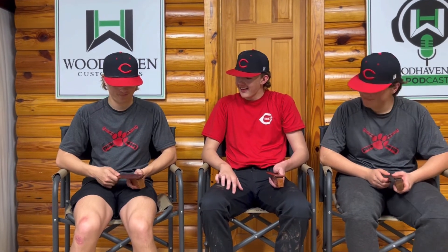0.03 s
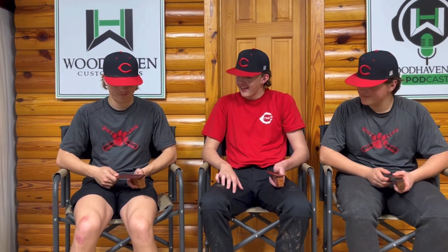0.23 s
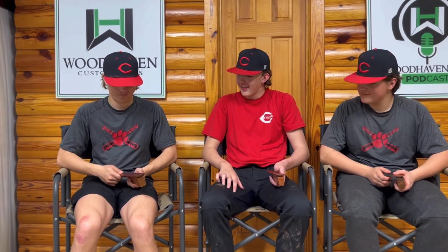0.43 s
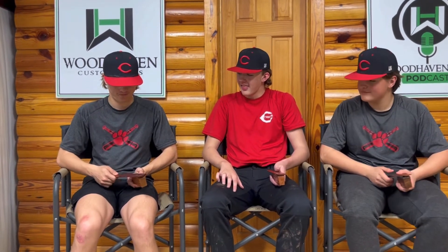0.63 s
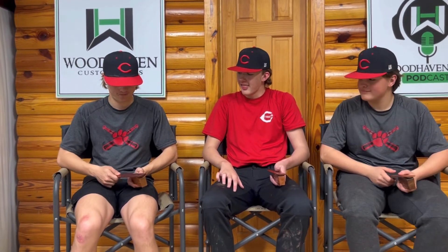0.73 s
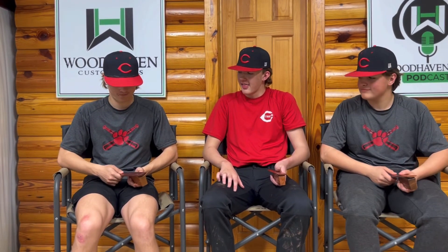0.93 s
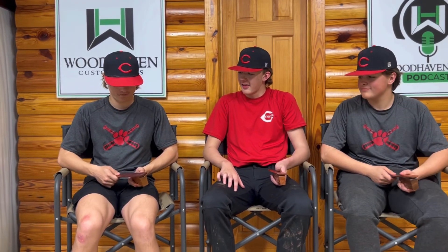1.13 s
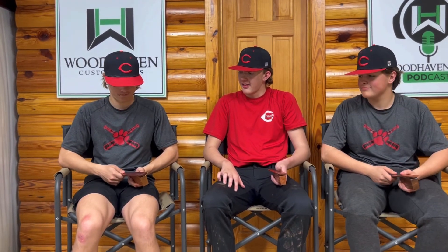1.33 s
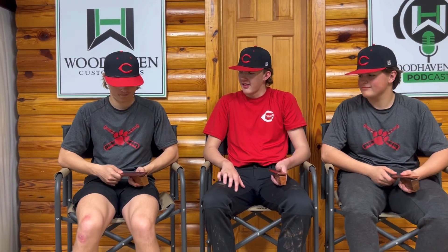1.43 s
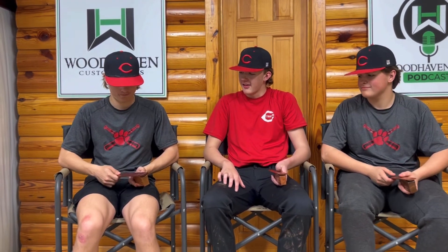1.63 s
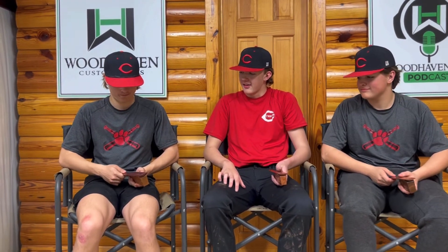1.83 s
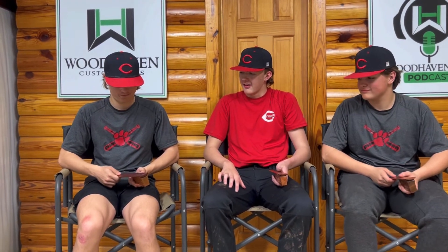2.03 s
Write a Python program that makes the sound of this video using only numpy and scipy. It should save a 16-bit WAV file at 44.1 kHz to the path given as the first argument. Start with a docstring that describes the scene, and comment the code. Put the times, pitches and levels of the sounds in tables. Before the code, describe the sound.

A wooden friction turkey call gives four short, evenly spaced yelps, each starting clean and breaking upward into rasp. An earlier note's echo fades first. Log-walled room, stereo microphone a few metres away, faint rumble below.

```python
"""The echo of an earlier stroke dies away, then a friction turkey call yelps four times in a log-walled room.
In each yelp a wooden tip dragged over a plate sticks and slips about 800 times a second. It catches with a
burst of grit, sounds clean, then skids: the pitch jumps and a rasp swells and fades. The plate colours the slips
and the room rings on. Two microphone ports a few metres off hear it. A hum that dips and returns, and a steady
low rumble, lie underneath throughout."""
import sys
import numpy as np
from scipy import signal
from scipy.fft import rfft, irfft, next_fast_len
from scipy.io import wavfile
from scipy.ndimage import uniform_filter1d

SR = 44100
rng = np.random.default_rng(int(sys.argv[2]) if len(sys.argv) > 2 else 0)


def voltage_ratio(level):
    """Linear amplitude factor for a level in decibels (scalar or array-like)."""
    return 10 ** (np.asarray(level, float) / 20)


def bounce(signal):
    """Save signal as a 16-bit WAV file at the path given by the first command-line argument."""
    frames = np.transpose(np.atleast_2d(signal))
    limited = np.clip(frames, -1, 1)
    pcm = np.round(limited * 32767).astype(np.int16)
    wavfile.write(sys.argv[1], SR, pcm)


N = 92610
LEAD = SR // 2  # samples worked out before time zero

# The path of each stroke, the first only an echo by time zero: [t/s, slip rate f/Hz, level/dB]
STROKE_PATHS = [
    [(-.26, 733, -9), (-.2, 785, -16), (-.14, 859, -29)],
    [(.2, 772.6, -32), (.213, 731.6, -24), (.24, 751, -18.5), (.28, 780.3, -17.5), (.315, 797.7, -16),
     (.338, 800.5, -21.5), (.362, 837.4, -25.5), (.385, 810, -47)],
    [(.636, 702, -49), (.648, 698.3, -35.5), (.66, 724.2, -29.5), (.696, 735.3, -22.5), (.708, 773.6, -25),
     (.76, 789.1, -20.5), (.805, 803.6, -19), (.825, 772.4, -27.5), (.85, 805.3, -24.5), (.878, 769, -51)],
    [(1.177, 804, -26), (1.184, 750.7, -23.5), (1.195, 768, -23.5), (1.235, 783.8, -18),
     (1.262, 805.7, -18.5), (1.288, 818.5, -19.5), (1.316, 829.8, -26), (1.34, 965, -34)],
    [(1.598, 735, -35), (1.63, 706.3, -24.5), (1.652, 726.8, -22), (1.662, 765.2, -26), (1.7, 785, -19),
     (1.75, 798, -20), (1.77, 795.2, -17), (1.82, 822.3, -25), (1.85, 862, -59)],
]
# Where each stroke's tip skids: [t/s, rate jump f/Hz before it is shaped in time,
# rasp 0-1 before it is shaped in time, steady grit level/dB against the slips]
SKIDS = [(-.17, 111, 0.2, -11.5), (0.323, 116.8, 0.8, -19.5), (0.829, 57, 1, -13.5),
         (1.266, 103.6, 0.67, -15.5), (1.751, 102.2, 1, -16.5)]
# How the plate colours the slips: [f/Hz, relative level/dB]
PLATE_COLOUR = [(400, -29.5), (720, -22), (840, -26.5), (1450, -8), (1650, -1), (2150, -8.5), (2550, 7),
                (3050, -12.5), (3550, -20.5), (3930, -17.5), (4680, -14.5), (5050, -21), (5350, -18.5),
                (6000, -22.5), (6500, -25), (9000, -34), (15500, -47)]
# Colour of the gritty hiss: [f/Hz, relative level/dB]
GRIT_COLOUR = [(200, -20.5), (800, -59), (1350, 4.5), (1980, 5), (2700, 14.5), (4000, -9), (6500, -1),
               (9000, -19), (15500, -46)]
# Time the room takes to fade by 60 dB: [f/Hz, t/s]
ROOM_FADE = [(600, 0.16), (1600, 0.27), (2260, 0.33), (4000, 0.47), (11000, 0.61)]
# The part of the echo that differs left and right, against the shared part: [f/Hz, level/dB]
ROOM_DIFFERENCE = [(500, 3.5), (1600, -4.5), (3500, 28.5), (6500, -11.5), (8500, -9), (12000, -85)]
# Bands that hang on in the room: [f/Hz, level/dB against the room]
LINGERING_BANDS = [(1400, -17.5), (2000, -12.5)]
# Loudness of the left port over the right: [f/Hz, level/dB]
PORT_LEVEL_GAP = [(1700, -0.5), (2200, -7.5), (2800, -3), (4000, 9.5), (6000, 9), (7500, 13), (8500, -3)]
# How far the left port leads the right: [f/Hz, phase/radians]
PORT_PHASE_LEAD = [(0, 0), (700, .6), (1750, .7), (2050, 3.5), (2800, 3.3), (4100, 4), (6000, 6),
                   (7000, 8.8), (8270, 6.3), (10100, 3.14), (15300, -6.3)]
# The hum tones before drift, swell and pan: [f/Hz, rms level/dB]
HUM_TONES = [(91.5, -64), (140.0, -62.5)]
# The hum dips and returns: [t/s, level/dB]
HUM_LEVEL_PATH = [(0, 3), (.95, 2), (1.1, -6), (1.5, -5.5), (1.9, 0), (2.1, -3.5)]
# Colour of the rumble: [f/Hz, relative level/dB per Hz]
RUMBLE_COLOUR = [(20, -67), (31, -39), (42, 3.5), (126, -0.5), (157, -16), (189, -11), (300, -24),
                 (500, -30), (1300, -40)]

LAND_S, LIFT_S = 0.0064, 0.018  # the tip lands and lifts
CATCH_DB, CATCH_S = -8.5, 0.004  # burst of grit as the tip catches, and its decay
SKID_S, SETTLE_S, RASP_FADE_S = 0.0018, 0.005, 0.035  # skid builds, pitch settles, rasp fades
JITTER_CLEAN, JITTER_RASP = 0.006, 0.022  # spread of the slip rate before smoothing, share; rasp adds
SIZE_CLEAN_DB, SIZE_RASP_DB = 0.3, 3  # spread of the slip size before smoothing; rasp adds
SCRAPE_RASP_DB = -10  # grit added at full rasp
WOBBLE_DB, WOBBLE_S = 5, 0.016  # spread of the wobble points, and the time between them
BRIGHTEN = 0.18  # dB per octave of tilt for each dB of level
ROOM_DB, ROOM_GAP_S = -4.5, 0.003  # dense echo against the direct sound; wait for it
LINGER_T60_S = 0.53  # time for a lingering band to fade by 60 dB
HUM_DRIFT = 0.0067  # spread of the random phase step, radians per sample
RUMBLE_DB, RUMBLE_SIDE_DB = -59.5, -12  # rms before pan; left-right part against the middle
BACKGROUND_PAN_DB = 2  # left over right, hum and rumble alike


def colour(x, table, turn=False):
    """Weights the spectrum by (Hz, dB) points, or turns its phase by (Hz, radians) points."""
    size = next_fast_len(x.shape[-1])
    hz = np.arange(size // 2 + 1) * SR / size + 1
    f, v = np.array(table, float).T
    if turn:
        gain = np.exp(1j * np.interp(hz, f, v))
    else:
        gain = voltage_ratio(np.interp(np.log(hz), np.log(f + 1), v))
    return irfft(rfft(x, size) * gain, size)[..., :x.shape[-1]]


def set_rms(x, db):
    """Scales the sound so that its average strength (rms) is db."""
    return x * voltage_ratio(db) / np.sqrt(np.mean(x ** 2))


def slip_tone(t, phase, db):
    """Regular slips make a pitch with 18 harmonics; more level brightens them, and the upper ones wobble."""
    wobble = rng.standard_normal((19, 20))
    points = (t - t[0]) / WOBBLE_S
    tone = np.zeros(len(t))
    for k in range(1, 19):
        gain_db = BRIGHTEN * (db - db.max()) * np.log2(k / 2)
        if k > 3:  # each of these swells and fades on its own
            gain_db = gain_db + WOBBLE_DB * np.interp(points, np.arange(20), wobble[k])
        tone += np.cos(2 * np.pi * k * phase) * voltage_ratio(gain_db)
    return tone


def scraping_grit(t, phase, rasp, steady_db):
    """Hiss that bursts and decays once a slip, stronger as the tip catches and as it rasps."""
    noise = rng.standard_normal(SR // 2)[:len(t)]
    pulsed = noise * np.exp(-(phase % 1) / 0.5)
    catch = voltage_ratio(CATCH_DB) * np.exp((t[0] - t) / CATCH_S)
    strength = voltage_ratio(steady_db) + voltage_ratio(SCRAPE_RASP_DB) * rasp + catch
    return set_rms(colour(pulsed, GRIT_COLOUR), 0) * strength


def stroke(path, skid):
    """One drag: uneven slips coloured by the plate, plus grit. Returns start sample and sound."""
    path_s, path_hz, path_db = np.array(path, float).T
    skid_s, jump_hz, rasp_amount, grit_db = skid
    t = np.arange(path_s[0] - LAND_S, path_s[-1] + LIFT_S, 1 / SR)
    since = np.maximum(t - skid_s, 0)
    onset = 1 - np.exp(-since / SKID_S)
    jump = jump_hz * 2 * onset * np.exp(-since / SETTLE_S)
    rate = np.interp(t, path_s, path_hz) + jump
    rasp = np.clip(rasp_amount, 0, 1) * onset * np.exp(-since / RASP_FADE_S)

    # each slip draws its own rate and size, smoothed over about a slip
    slip_number = (np.cumsum(rate) / SR).astype(int)
    rate_chance, size_chance = rng.standard_normal((500, 2))[slip_number].T
    jitter = JITTER_CLEAN + JITTER_RASP * rasp
    rate = rate * (1 + jitter * uniform_filter1d(rate_chance, size=45))
    phase = np.cumsum(rate) / SR  # in slips
    db = np.interp(t, path_s, path_db)
    size_db = (SIZE_CLEAN_DB + SIZE_RASP_DB * rasp) * uniform_filter1d(size_chance, size=20)
    slips = slip_tone(t, phase, db) * voltage_ratio(size_db)
    plate = set_rms(colour(slips, PLATE_COLOUR), 0)
    grit = scraping_grit(t, phase, rasp, grit_db)
    edge = np.clip(np.minimum((t - t[0]) / LAND_S, (t[-1] - t) / LIFT_S), 0, 1) ** 2
    return LEAD + int(t[0] * SR), (plate + grit) * voltage_ratio(db) * edge


def room():
    """Direct sound, then a dense echo that fades band by band, partly unlike left and right."""
    t = np.arange(SR) / SR
    echo = np.zeros((2, SR))
    fade_hz, fade_s = np.array(ROOM_FADE).T
    for hz in 400 * 2 ** np.arange(0, 5.4, 0.5):  # half-octave bands
        both, left, right = rng.standard_normal((3, SR))
        noise = both + colour(np.array([left, right]), ROOM_DIFFERENCE)
        half = 2 ** 0.5
        band = colour(noise, [(hz / 2, -60), (hz / half, -20), (hz, 0), (hz * half, -20), (hz * 2, -60)])
        t60 = np.interp(np.log(hz), np.log(fade_hz), fade_s)
        tail = band * voltage_ratio(-60 * t / t60) * (t > ROOM_GAP_S)
        echo += tail * np.sqrt(hz / np.sum(tail ** 2))  # wider bands carry more energy
    echo *= voltage_ratio(ROOM_DB) / np.sqrt(np.sum(echo ** 2) / 2)
    for hz, db in LINGERING_BANDS:
        ring = colour(rng.standard_normal((2, SR)), [(hz * 0.75, -40), (hz, 0), (hz * 1.3, -40)])
        echo += set_rms(ring * voltage_ratio(-60 * t / LINGER_T60_S), ROOM_DB + db) / np.sqrt(SR)
    echo[:, 0] += 1  # the direct sound
    return echo / np.sqrt(1 + voltage_ratio(2 * ROOM_DB))


def microphone_ports(heard):
    """The two ports differ in loudness and phase by pitch; each side takes half the difference."""
    ports = []
    for x, side in zip(heard, (1, -1)):
        balanced = colour(x, [(f, side * v / 2) for f, v in PORT_LEVEL_GAP])
        ports.append(colour(balanced, [(f, side * v / 2) for f, v in PORT_PHASE_LEAD], turn=True))
    return np.array(ports)


def hum():
    """Two low sine tones whose phases wander at random while their level dips and returns."""
    t = np.arange(N) / SR
    swell = voltage_ratio(np.interp(t, *np.array(HUM_LEVEL_PATH).T))
    drift = np.cumsum(rng.standard_normal((2, N)), axis=1) * HUM_DRIFT
    tones = np.zeros(N)
    for (hz, db), wander in zip(HUM_TONES, drift):
        tones += 2 ** 0.5 * voltage_ratio(db) * np.sin(2 * np.pi * hz * t + wander)  # root 2 turns rms into peak
    return tones * swell


def rumble():
    """Low coloured noise, nearly the same left and right."""
    mid, side = (set_rms(colour(rng.standard_normal(N), RUMBLE_COLOUR), RUMBLE_DB) for _ in range(2))
    return mid + voltage_ratio(RUMBLE_SIDE_DB) * side * np.array([[1], [-1]])


def scene():
    """Strokes through the room and the two ports, over hum and rumble."""
    call = np.zeros(LEAD + N)
    for path, skid in zip(STROKE_PATHS, SKIDS):
        start, sound = stroke(path, skid)
        call[start:start + len(sound)] += sound
    heard = signal.fftconvolve(call[None], room(), axes=1)[:, :LEAD + N]
    pan = voltage_ratio(np.array([[BACKGROUND_PAN_DB], [-BACKGROUND_PAN_DB]]) / 2)
    background = pan * (hum() + rumble())
    return microphone_ports(heard)[:, LEAD:] + background


def low_pass(x):
    """Removes everything above the highest recorded frequency."""
    return signal.sosfilt(signal.butter(12, 15870, fs=SR, output="sos"), x)


def record(dry):
    """Passes on the finished mix."""
    return low_pass(dry)


dry = scene()
out = record(dry)
bounce(out)
```